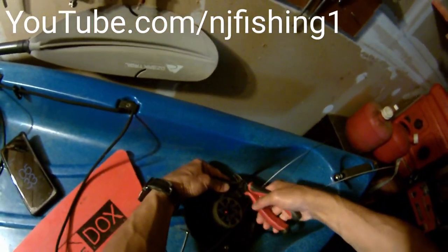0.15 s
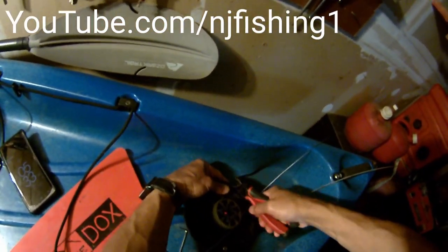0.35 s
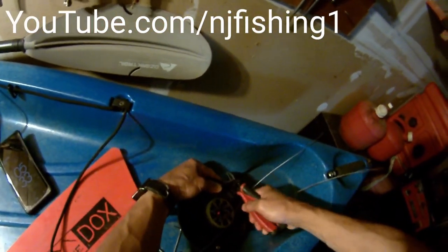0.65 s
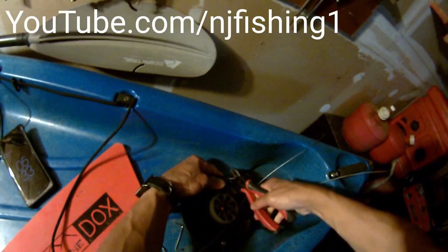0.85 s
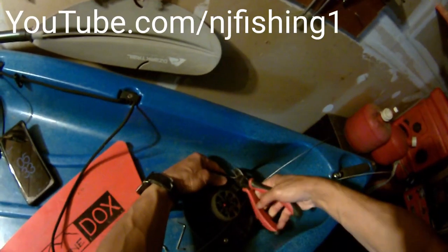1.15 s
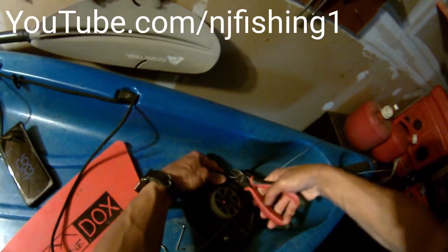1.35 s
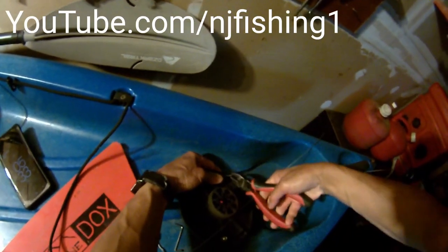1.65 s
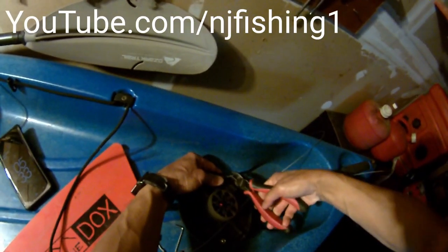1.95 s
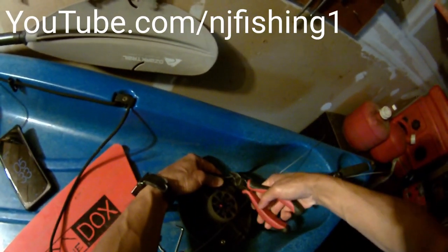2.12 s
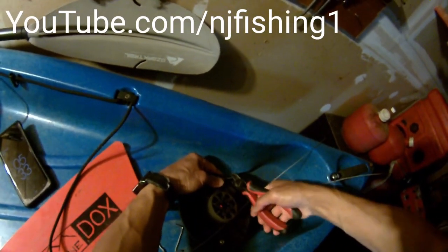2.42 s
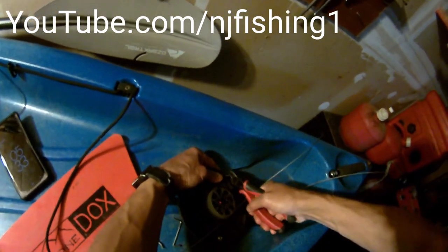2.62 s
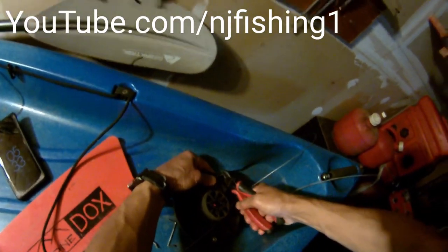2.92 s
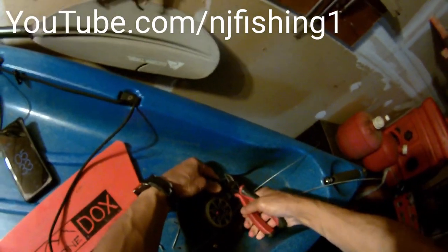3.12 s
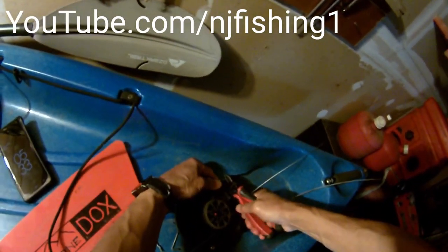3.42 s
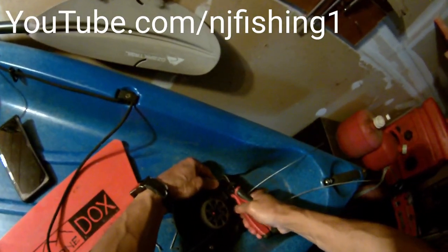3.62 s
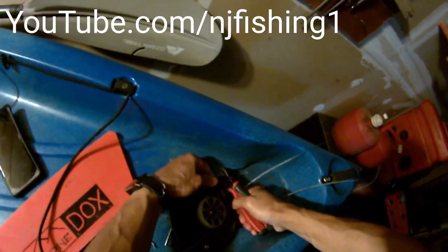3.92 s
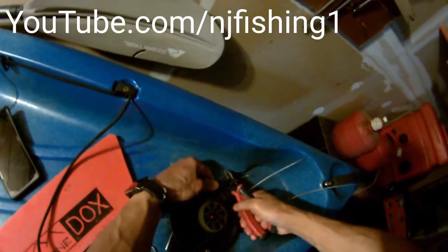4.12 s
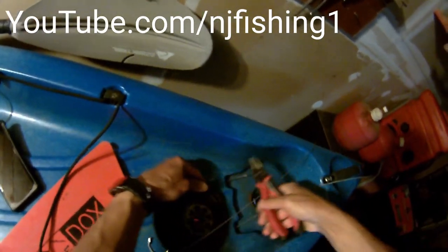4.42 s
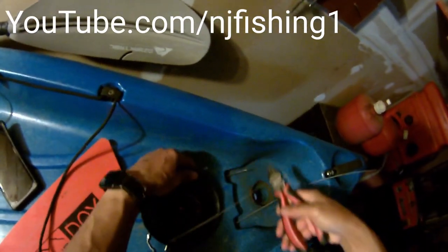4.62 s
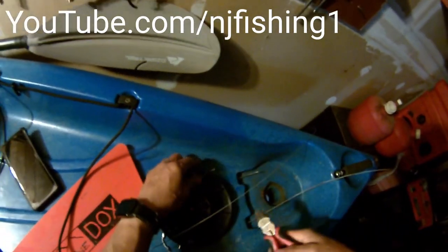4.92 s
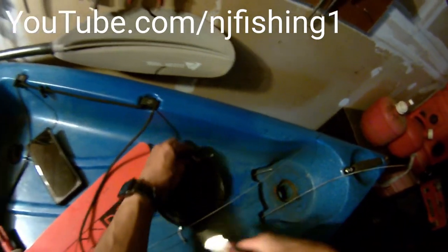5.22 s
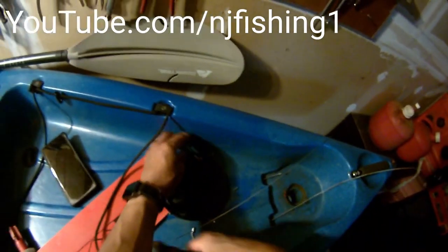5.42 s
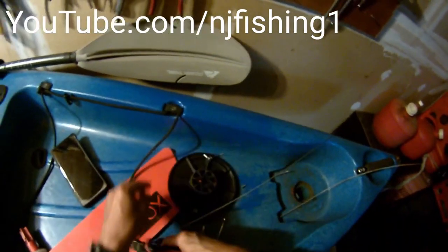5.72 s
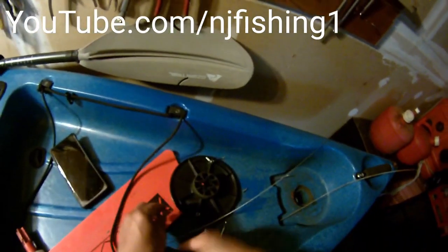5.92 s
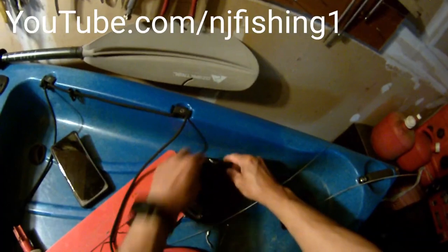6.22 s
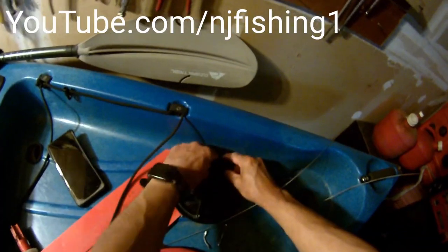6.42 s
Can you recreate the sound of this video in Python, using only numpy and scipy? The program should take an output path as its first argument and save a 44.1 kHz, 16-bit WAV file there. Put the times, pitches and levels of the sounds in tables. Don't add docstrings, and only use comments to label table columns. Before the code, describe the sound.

Small metallic clicks and soft hull taps in a quiet garage, a sharp cable snap, light bumps, then hard rattling knocks of a dropped reel.

```python
import sys
import numpy as np
from scipy import signal
from scipy.fft import rfft, irfft, next_fast_len
from scipy.io import wavfile
from scipy.ndimage import uniform_filter1d

SR = 44100
rng = np.random.default_rng(int(sys.argv[2]) if len(sys.argv) > 2 else 0)


def volts_from_db(level):
    exponent = np.asarray(level, float) / 20
    return 10 ** exponent


def master(y):
    cut = np.clip(np.atleast_2d(y).T, -1, 1)
    pcm = np.round(cut * 32767)
    wavfile.write(sys.argv[1], SR, pcm.astype(np.int16))


N = 288987


def read(points, hz):
    f, value = np.transpose(points)
    return np.interp(np.log(hz + 1), np.log(f + 1), value)


def evened(x):
    return x / np.sqrt(np.mean(x ** 2) + 1e-20)


def add(mix, start_s, sound):
    part = mix[round(start_s * SR):][:len(sound)]
    part += sound[:len(part)]


def coloured(x, points):
    length = x.shape[-1]
    size = next_fast_len(length)
    gain = volts_from_db(read(points, np.fft.rfftfreq(size, 1 / SR)))
    return irfft(rfft(x, size) * gain, size)[..., :length]


# pitch_hz, density_db_per_hz
HISS = [(88, -45.5), (150, -6), (285, -4), (320, -0.5), (352, -3), (572, -2), (708, -4), (1700, -8.5),
        (15500, -19)]


def hiss():
    return volts_from_db(-56.5) * evened(coloured(rng.standard_normal(N), HISS))


# pitch_hz, t60_s
GARAGE_DECAY = [(150, 0.7), (500, 0.5), (1500, 0.25), (4000, 0.29), (8000, 0.22), (14000, 0.013)]


def garage(x):
    taps = np.zeros(SR // 2)
    at = np.arange(300, len(taps) - 8, 8)
    taps[at + rng.integers(0, 8, len(at))] = rng.choice([-1., 1.], len(at))
    hz, t, z = signal.stft(taps, SR, nperseg=256)
    t60_s = np.maximum(read(GARAGE_DECAY, hz), .03)[:, None]
    tail = signal.istft(z * volts_from_db(-60 * t / t60_s), SR, nperseg=256)[1]
    return signal.oaconvolve(x, tail / np.linalg.norm(tail))[:N]


# time_s, level_db
SWAY = [(0.0, -76), (0.13, -65.5), (2.46, -67.5), (2.59, -57), (3.37, -66), (3.56, -57.5), (3.92, -63),
        (4.01, -48.5), (4.07, -66.5), (4.32, -49), (4.49, -64), (6.55, -63)]


def rumble(near):
    deep_db = np.interp(np.arange(N) / SR, *np.transpose(SWAY))
    handling = uniform_filter1d(near ** 2, size=6000, origin=2900)
    handling_db = 10 * np.log10(np.clip(handling, 1e-6, 1e-3))
    low_db = -70 + 0.36 * (deep_db + 66.5) + 0.5 * (handling_db + 49)
    deep_band = [(12, -40.5), (25, 0.0), (45, -15.0), (75, -25.5), (200, -48.0)]
    low_band = [(30, -65.5), (55, -6.5), (150, -0.5), (230, -33), (500, -82.5)]
    deep = volts_from_db(deep_db) * evened(coloured(rng.standard_normal(N), deep_band))
    low = volts_from_db(low_db) * evened(coloured(rng.standard_normal(N), low_band))
    return deep + low


# start_s, level_db
THUMPS = [
    (0.464, -61),
    (0.897, -56),
    (2.638, -50),
    (3.132, -65),
    (3.962, -32),
    (4.278, -36.5),
    (4.299, -56),
    (4.599, -45),
    (5.539, -44),
    (5.909, -37),
]


def thumps(swing_hz=70.5):
    out, t = np.zeros(N), np.arange(4000) / SR
    swing = np.sin(2 * np.pi * swing_hz * t) * np.exp(-t * swing_hz * 4.3)
    for start_s, level_db in THUMPS:
        add(out, start_s, volts_from_db(level_db + 9) * swing)
    return out


def ring(modes, crowd_db, spread_db, size):
    hz, db, t60_s = np.transpose(modes)[..., None]
    shift, weight = rng.standard_normal((2, len(modes), 5, 1))
    shift[:, 0] = 0
    crowd = np.r_[1, np.full(4, volts_from_db(crowd_db))][:, None] * volts_from_db(spread_db * weight)
    t = np.arange(size) / SR
    turns = (hz[..., None] * (1 + 0.0612 * shift) * t).astype(np.float32)
    waves = crowd * np.sin(np.float32(2 * np.pi) * turns)
    fade = volts_from_db(-60 * t / t60_s)
    waves = waves[:, 0] + waves[:, 1:].sum(1) * fade ** .7
    onset = 1 - np.exp(-t * hz * 1.25)
    return (waves * volts_from_db(db) * fade * onset).sum(0)


# pitch_hz, level_db, t60_s
HULL = [(210.5, 0, 0.034), (282.2, -4, 0.044), (380, 0, 0.045), (522, 0, 0.046), (590, 3.5, 0.025),
        (780, -8, 0.029)]
HANDLE = [(960, -10.5, 0.0073), (1380, -1, 0.018), (1594, 5, 0.011), (1870, 8, 0.006), (2230, 1, 0.012),
          (2380, 13, 0.0021), (2990, -7.5, 0.0071)]
STEEL = [(4110, -2, 0.028), (4400, -5.5, 0.051), (4235, 10.5, 0.036), (5030, 13, 0.01), (6100, -30, 0.036),
         (6570, -48, 0.007)]
RIM = [(2570, -16, .015), (2485, -8, 0.0096), (2590, 10.5, 0.012)]
# start_s, firmest_s, end_s, pressure_db, grit_db
STROKES = [(0.837, 0.94, 1.3, -50.5, -17.5), (1.642, 1.702, 1.706, -50, 3), (1.846, 1.87, 2.34, -63.5, 4),
           (2.893, 3.01, 3.17, -56, -21.5), (3.145, 3.135, 3.3, -49, -26), (3.364, 3.463, 3.5, -54, -18),
           (3.582, 3.6, 3.66, -44, -21), (3.65, 3.66, 3.73, -51, -13.5), (3.73, 3.77, 3.92, -53.5, -7.5),
           (5.179, 5.197, 5.25, -43, -13.5), (5.223, 5.244, 5.3, -38.5, -12.5),
           (5.249, 5.328, 5.39, -46.5, 10), (5.325, 5.347, 5.43, -34.5, -11.5),
           (5.447, 5.452, 5.49, -49, -9), (5.489, 5.511, 5.54, -27.5, -15),
           (5.533, 5.554, 5.65, -28.5, -11.5), (5.653, 5.694, 5.84, -60, -4), (5.929, 5.955, 6.0, -22, -16),
           (5.997, 6.014, 6.09, -36, -13)]


def rubs(slips_per_s=2500, grain_db=4):
    slips = (rng.random(N) < slips_per_s / SR) * volts_from_db(grain_db * np.minimum(rng.exponential(1, N), 3))
    slips = slips * rng.choice([-1., 1.], N)
    bodies = []
    for modes in (HULL, HANDLE[:4], RIM, STEEL):
        response = ring(modes, crowd_db=-1, spread_db=0.77, size=3000)
        bodies.append(evened(signal.oaconvolve(slips, response)[:N]))
    out = np.zeros(N)
    for start_s, firmest_s, end_s, pressure_db, grit_db in STROKES:
        t = np.arange(start_s, end_s, 1 / SR)
        rim_db = grit_db - 6.5 + 0.3766 * (pressure_db + 53.5)
        shares_db = 0, 0.39 * grit_db, rim_db, grit_db
        at = round(start_s * SR)
        grains = sum(volts_from_db(db) * body[at:][:len(t)] for db, body in zip(shares_db, bodies))
        swell_db = np.interp(t, (start_s, firmest_s, end_s), (-14, 0, -22))
        add(out, start_s, grains * volts_from_db(pressure_db + swell_db) * signal.windows.tukey(len(t), .12))
    return out


def hits(rows, bodies, crowd_db, spread_db, chatter_db, last_s, bare_db, size):
    out, t = np.zeros(N), np.arange(size) / SR
    for start_s, *levels_db, t60_s in rows:
        unevenness = evened(uniform_filter1d(rng.standard_normal(size), 40))
        chatter = evened(rng.standard_normal(size) * volts_from_db(3.4 * unevenness))
        force = chatter * volts_from_db(chatter_db - 60 * t / max(t60_s, .004))
        force = force * np.clip((last_s - t) / 0.0016, 0, 1)
        force = force * (1 + 1.5 * np.exp(-t / .0015))
        force[0] = 1
        add(out, start_s, volts_from_db(levels_db[2] + bare_db) * np.diff(force))
        held = volts_from_db(-60 * t / (0.09 + 2.9 * t60_s + .02))
        for level_db, body in zip(levels_db, bodies):
            response = ring(body, crowd_db, spread_db, size)
            sound = signal.fftconvolve(force, response)[:size] * held
            loudest = np.sqrt(uniform_filter1d(sound ** 2, 180).max())
            add(out, start_s, volts_from_db(level_db) * sound / loudest)
    return out


def edged(rows, edge_db, per_db, from_db):
    out = []
    for start_s, handle_db, hull_db, steel_db, t60_s in rows:
        bright_db = steel_db + edge_db + per_db * (steel_db - from_db)
        out.append((start_s, handle_db, hull_db, steel_db, bright_db, t60_s))
    return out


# pitch_hz, level_db, t60_s
REEL_HULL = [(217, -10, 0.12), (325.8, 1, .11), (470, -2, 0.15), (555, -3, 0.069), (681, -9.5, 0.078),
             (884, -17, 0.14)]
REEL_BODY = [(980, -3.5, 0.069), (1149, 2.5, 0.1), (1287, -1, 0.083), (1430, -1, 0.068), (1687, -6, 0.15),
             (1862, -2, 0.054), (2510, -12, 0.16)]
REEL_STEEL = [(3670, -31, 0.051), (3890, -18, 0.067), (4210, 1, 0.1), (4500, -7, 0.095), (5120, -8, 0.033),
              (5410, -11.5, 0.026), (5660, -3.5, 0.041), (5940, -6, 0.043), (6950, 0, 0.012)]
REEL_EDGE = [(6860, -39, 0.035), (8960, -5, 0.02), (9550, -8, 0.013), (9500, -15, 0.056),
             (13200, -13, 0.0042)]
# start_s, body_db, hull_db, steel_db, contact_t60_s
KNOCKS = [(5.1963, -45.5, -46, -68, 0.041), (5.225, -40, -40, -68, 0.11), (5.4022, -39, -40.5, -48, 0.04),
          (5.449, -48, -39.5, -68, 0.3), (5.4913, -16.5, -22, -24.5, 0.088),
          (5.542, -18.5, -18.5, -34.5, 0.02), (5.5944, -44, -35, -66, 0.13), (5.7713, -45, -39, -58, 0.11),
          (5.8386, -50, -40, -58, 0.064), (5.911, -6.5, -15.5, -15, 0.11), (6.0201, -31, -26.5, -54, 0.09),
          (6.11, -13.5, -16.5, -12.5, 0.17), (6.2014, -19.5, -21.5, -29, 0.04),
          (6.314, -31.5, -28, -42, 0.11), (6.3825, -44.5, -45, -53.5, 0.033),
          (6.4438, -49, -44, -55.5, 0.12), (6.5212, -43, -42.5, -54.5, 0.069)]


def reel_knocks():
    rows = edged(KNOCKS, edge_db=-1.5, per_db=3, from_db=-10.5)
    return hits(rows, (REEL_BODY, REEL_HULL, REEL_STEEL, REEL_EDGE), crowd_db=-4.5, spread_db=2.5,
                chatter_db=-11.5, last_s=0.084, bare_db=-12.0, size=5000)


# pitch_hz, level_db, t60_s
EDGE = [(7750, -6.5, 0.054), (9300, -7, 0.0063), (12120, -32, 0.0013), (12700, -11.5, 0.004)]
# start_s, strength_db, handle_share_db, contact_t60_s
CLICKS = [(0.0837, -50.5, -2, 0.068), (0.1619, -41, -7, 0.053), (0.317, -48, -19, 0.029),
          (0.814, -56, -11, .02), (1.1588, -45.5, 2.5, 0.034), (1.9118, -47, 9, .018),
          (1.944, -51.5, 3, .02), (1.9652, -52, -4, 0.031), (2.015, -53, -1, .03), (2.7177, -22, -2, 0.043),
          (2.799, -35.5, -1.5, 0.027), (3.6676, -45.5, 0.5, 0.042)]
# start_s, strength_db, hull_share_db, steel_share_db, contact_t60_s
GRIPS = [(0.581, -40, 1, -23, 0.055), (0.7509, -37, 0, -18, 0.054), (1.049, -40.5, -8, -12, 0.025),
         (1.144, -41.5, -5, -17, 0.096), (1.2829, -36, -15, -16, 0.035), (1.482, -41, -4.5, -9.5, 0.021),
         (1.517, -33, -3, -5.5, 0.13), (1.5334, -28, -15, -12.5, 0.055), (2.7413, -24, -1, -17, 0.012),
         (3.134, -35.5, 0.5, -30, 0.12), (3.6015, -33, -2, -25, .023)]
# start_s, strength_db, handle_share_db, steel_share_db, contact_t60_s
TAPS = [
    (0.4664, -37, -19, -27, 0.063),
    (1.397, -47.5, -7, -9, 0.041),
    (1.808, -39, -16, -25, 0.11),
    (2.636, -25.5, -12, -34, 0.096),
    (3.2387, -48, -6, -12, 0.036),
    (3.4514, -46, -18, -22, 0.01),
    (4.0876, -36, -1.5, -6, .012),
    (4.2765, -27.5, -5.5, -6, 0.0066),
    (4.301, -24.5, -11, -7, 0.011),
    (4.514, -27.5, -5, -11.5, 0.083),
]
# start_s, strength_db, handle_share_db, contact_t60_s
BUMPS = [
    (4.3465, -44, -17, 0.025),
    (4.6024, -40.5, 2, .06),
    (4.678, -34.5, -6.5, 0.065),
    (4.7937, -31.5, -5, 0.034),
    (5.0384, -34.5, -5, .044),
]


def plier_touches():
    rows = [(s, db + handle, db - 17, db, t60) for s, db, handle, t60 in CLICKS]
    rows += [(s, db, db + hull, db + steel, t60) for s, db, hull, steel, t60 in GRIPS]
    rows += [(s, db + handle, db, db + steel, t60) for s, db, handle, steel, t60 in TAPS]
    rows += [(s, db + handle, db, db - 30, t60) for s, db, handle, t60 in BUMPS]
    rows = edged(rows, edge_db=-21, per_db=2.01, from_db=-33.5)
    return hits(rows, (HANDLE, HULL, STEEL, EDGE), crowd_db=1, spread_db=8, chatter_db=-11.5,
                last_s=.06, bare_db=-3, size=2200)


# pitch_hz, level_db, t60_s
JAW = [(1136, -10, .014), (1400, -3, .01), (1620, 0, .013), (1850, -4, .009), (2455, -12, .01)]
WIRE = [(3520, -11.5, 0.0017), (4240, -1, 0.012), (4479, 4, .01), (4950, 1, .006), (5300, -2.5, 0.0066),
        (6100, -8, 0.0024)]
# start_s, handle_db, hull_db, steel_db, contact_t60_s
SNAP = [
    (3.964, -5, -14.5, -3.5, .3),
]


def cable_snap():
    rows = edged(SNAP, edge_db=-21.5, per_db=0, from_db=0)
    return hits(rows, (JAW, HULL, WIRE, EDGE), crowd_db=2, spread_db=-1.5, chatter_db=-2.5,
                last_s=0.015, bare_db=-6, size=3000)


# pitch_hz, gain_db
CASE = [(110, -30), (200, -3), (500, 0), (1900, 1), (2050, -5), (2500, -2), (3300, -6), (4250, 0),
        (4800, -2), (5700, 3), (6500, 0), (7000, -11), (9400, -5), (15500, -11)]


def cased(x):
    log_gain = np.log(volts_from_db(read(CASE, abs(np.fft.fftfreq(4096, 1 / SR)))))
    taps = np.fft.ifft(np.exp(np.conj(signal.hilbert(log_gain)))).real[:2048]
    return signal.oaconvolve(x, taps)[:N]


# pitch_hz, gain_db
SIDE_TONE = [(30, -29), (80, -23), (200, -30), (1400, -33), (2800, -26), (6000, -29), (13000, -28)]
# pitch_hz, gain_db
SIDE_HISS = [(200, -18.5), (1000, -17.5), (4000, -10), (13000, -6.5)]


def scene():
    near = rubs() + reel_knocks() + plier_touches() + cable_snap()
    mid = cased(near + volts_from_db(-17.5) * garage(near)) + hiss() + rumble(near) + thumps()
    scatter = rng.standard_normal(256) / 16
    side = coloured(signal.oaconvolve(mid, scatter)[:N], SIDE_TONE) + coloured(hiss(), SIDE_HISS)
    return np.array([mid + side, mid - side])


def low_pass(x):
    return signal.sosfilt(signal.butter(12, 15910, fs=SR, output="sos"), x)


def record(dry, recovery_db_per_s=5, deepest_db=9.5, peak=.8):
    treble = np.diff(dry.mean(0), prepend=0)
    power_db = 10 * np.log10(abs(uniform_filter1d(treble ** 2, 300)) + 1e-12)
    fall_db = np.arange(N) * recovery_db_per_s / SR
    cut_db = np.clip(0.3 * (power_db + 32.5), 0, deepest_db)
    held_db = np.maximum.accumulate(cut_db + fall_db) - fall_db
    late_db = signal.lfilter([1 / 500], [1, 1 / 500 - 1], held_db)
    clipped = np.clip(dry / volts_from_db(late_db), -peak, peak)
    band = signal.firwin(511, 15600, window=("kaiser", 9), fs=SR)
    return low_pass(signal.oaconvolve(clipped, band[None], "same"))


dry = scene()
out = record(dry)
master(out)
```